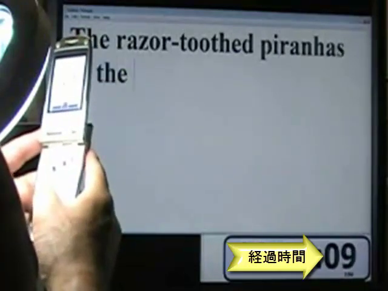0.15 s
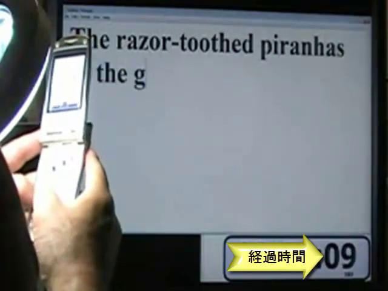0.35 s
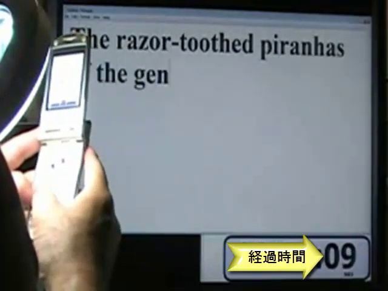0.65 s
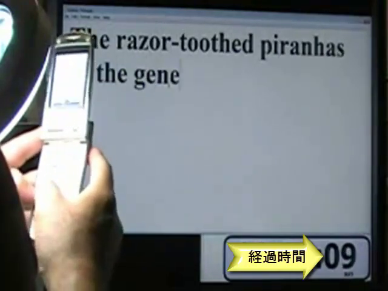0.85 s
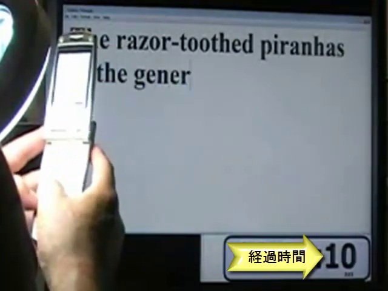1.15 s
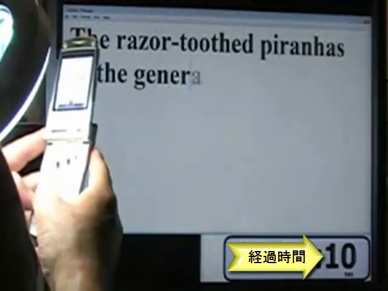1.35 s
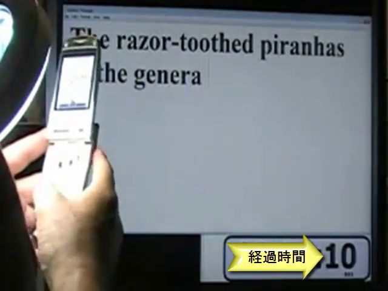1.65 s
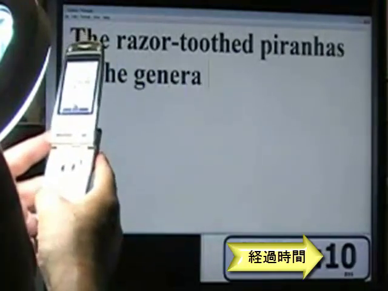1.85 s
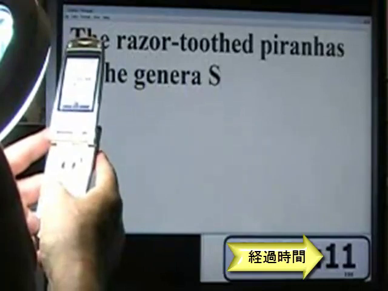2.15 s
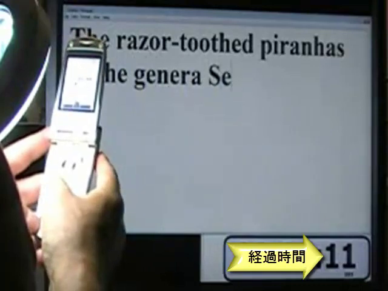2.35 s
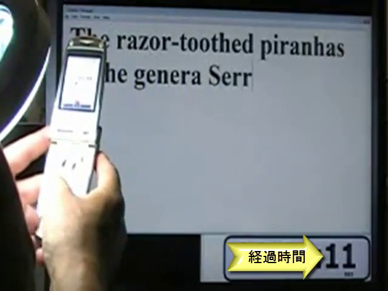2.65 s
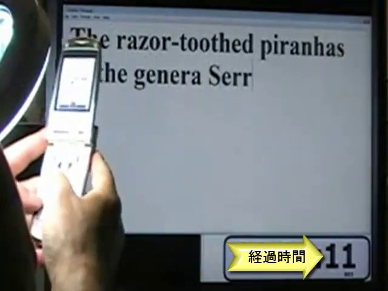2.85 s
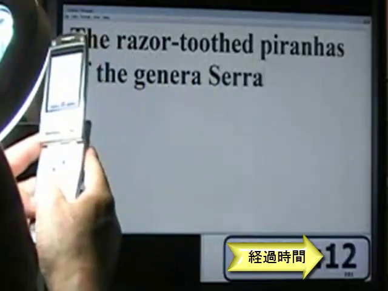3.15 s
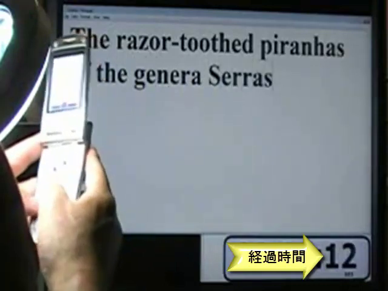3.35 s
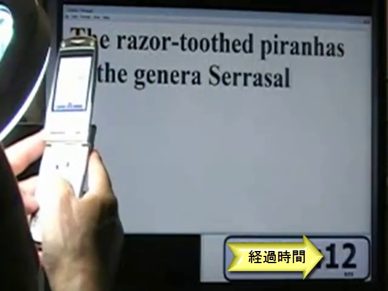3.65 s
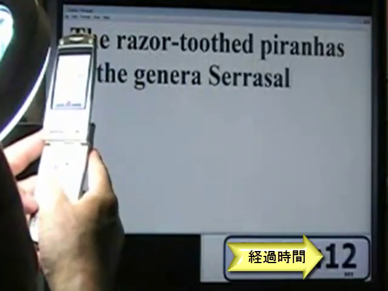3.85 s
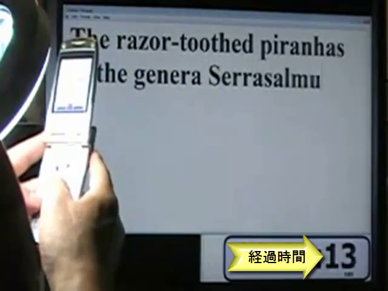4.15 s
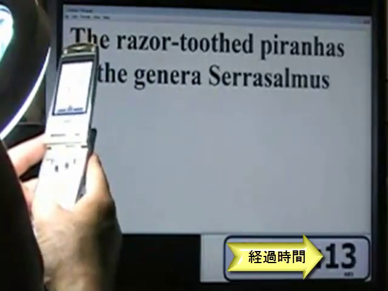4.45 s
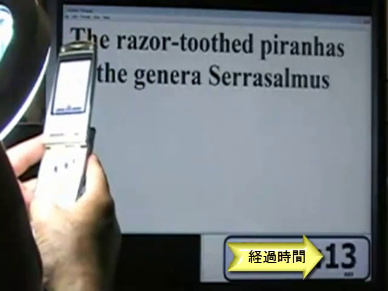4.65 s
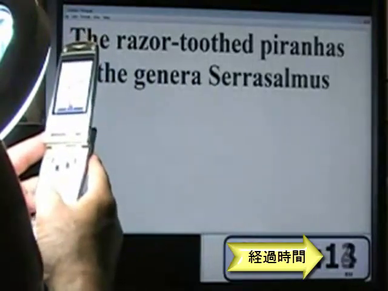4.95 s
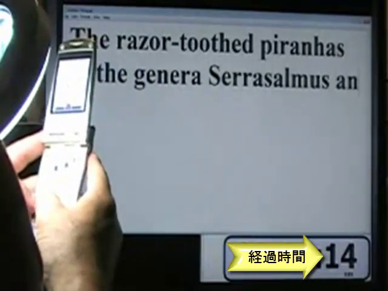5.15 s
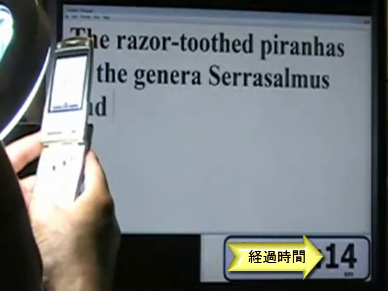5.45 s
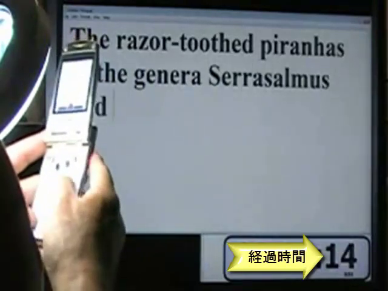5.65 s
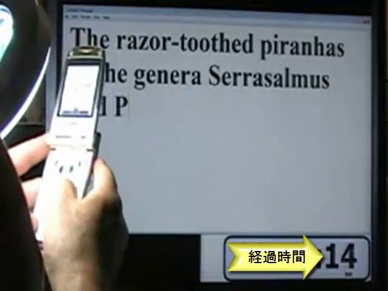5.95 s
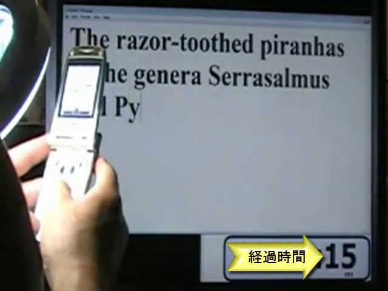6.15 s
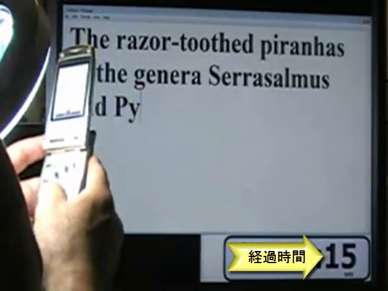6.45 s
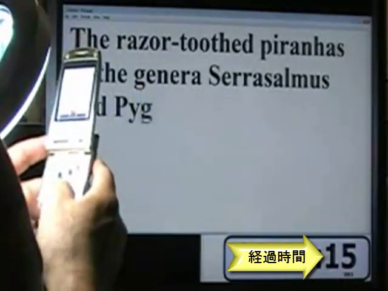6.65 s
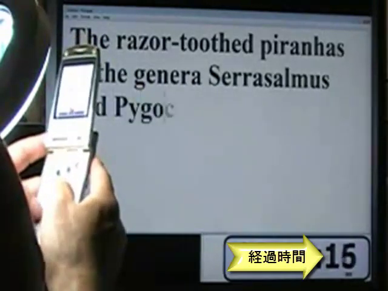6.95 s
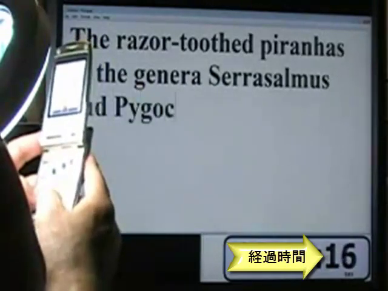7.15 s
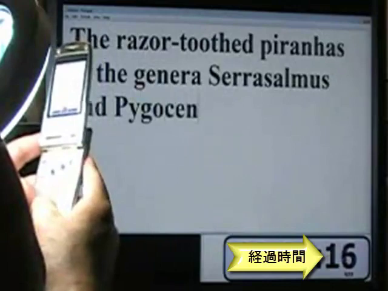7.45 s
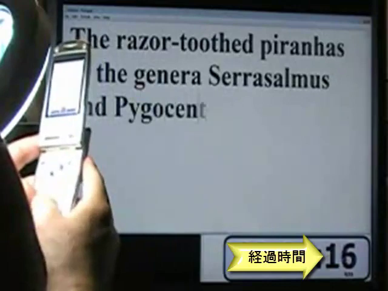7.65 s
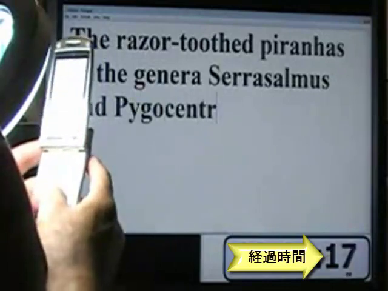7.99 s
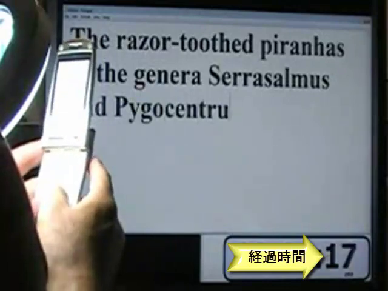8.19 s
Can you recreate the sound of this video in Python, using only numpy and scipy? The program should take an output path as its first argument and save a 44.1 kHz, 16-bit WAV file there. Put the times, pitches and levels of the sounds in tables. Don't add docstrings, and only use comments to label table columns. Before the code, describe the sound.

A thumb types quickly on a folding phone's small keypad, sharp plasticky clicks and tiny rattles over a faint steady fan hum indoors.

```python
import sys
import numpy as np
from scipy import signal
from scipy.io import wavfile
from scipy.ndimage import uniform_filter1d

SR = 44100
rng = np.random.default_rng(int(sys.argv[2]) if len(sys.argv) > 2 else 0)


def int16_out(signal):
    q = np.round(np.clip(np.atleast_2d(signal).T, -1, 1) * 32767)
    wavfile.write(sys.argv[1], SR, q.astype(np.int16))


def gain_from_db(level_db):
    decades = np.asarray(level_db, float) / 20
    return 10 ** decades


N = 366912

# pitch in Hz, level in dB per Hz.
AIR = [(30, -39), (90, -24.5), (200, -21.5), (280, -17), (420, -5.5), (650, -8.5), (1050, -9),
       (1500, -12.5), (2050, -19.5), (2800, -16.5), (3300, -29.5), (4200, -24.5), (7000, -24.5),
       (9200, -33)]
# pitch in Hz, level in dB rms, width in Hz.
TONES = [(60, -84, .24), (120, -88, 1), (300, -80, 1.5), (360, -79, 1.5), (420, -66, 1.2), (480, -69, 3),
         (540, -75, 4), (600, -75, 4), (724, -72, 5), (846, -75, 6), (960, -74, 8), (1083, -62, 4.5),
         (1446, -75, 8), (1510, -75, 20)]
# pitch in Hz, left minus right in dB.
LEAN = [(60, 3.5), (130, 1.5), (310, -1), (550, -2), (1000, -4.5), (1650, -1.5), (4000, -1)]
# pitch in Hz, likeness from -1 to 1.
SAME = [(60, 0.58), (120, 0.13), (250, -0.21), (510, -0.47), (1030, -0.23), (1500, -0.49), (2090, 0.11),
        (4260, 0.29), (8660, 0.42)]
# time in seconds, dip pitch in Hz, cover (about 0 to 1), whistle level in dB.
HAND = [(0, 2035, .2, -67), (.7, 2010, .35, -72), (1.2, 1880, .2, -80.5), (1.65, 1894, .4, -73),
        (2.25, 2040, .5, -82), (2.899, 1955, .35, -69), (3.4, 1940, .1, -65), (4.1, 1910, .2, -72.5),
        (4.78, 1986, .6, -70.5), (5.5, 2050, .1, -66), (6.3, 1790, .4, -70), (6.6, 2070, .6, -61.5),
        (6.969, 2150, .8, -72), (7.059, 2450, 1.08, -85), (7.44, 2520, 1.4, -87), (7.521, 2330, .35, -91),
        (7.94, 2280, .45, -87), (8.2, 2350, .8, -92)]
# delay in seconds, level in dB.
ECHOES = [(.0013, -8), (.0036, -16), (.0066, -16), (.0093, -17), (.0106, -19), (.0265, -17)]
# pitch in Hz, time to fall 60 dB in seconds.
ROOM = [(300, 0.31), (1000, 0.72), (2500, 0.36), (5000, 0.33), (8000, 0.24)]
# start in seconds, level in dB, pitch in Hz, 60 dB fall in seconds.
KNOCKS = [(.6765, -43.5, 595, 0.44), (0.73, -45, 1530, 0.11), (.697, -44, 630, 0.11),
          (0.697, -47.5, 1600, 0.18), (0.78, -43, 550, 0.11), (2.613, -41.5, 535, 0.1),
          (4.414, -48, 1250, 0.06), (5.08, -55, 192, 0.4), (5.3033, -35, 910, 0.27),
          (5.303, -38.5, 455, 0.33), (5.3032, -40, 655, 0.27), (5.304, -41.5, 2460, 0.29),
          (5.3032, -33, 3000, 0.23), (5.304, -39, 1920, 0.41), (5.3063, -42, 4800, 0.23),
          (5.3045, -36.5, 6850, 0.32), (5.3034, -40, 1240, 0.26), (5.368, -50.5, 198, 0.118),
          (5.53, -56.5, 201, 0.25), (6.1, -61, 177, 0.43), (6.8, -64, 190, .15), (7.42, -54.5, 250, 0.44)]
# pitch in Hz, 60 dB fall in seconds, level in dB, share of brightness (no unit).
CAP = [(4357, 0.012, -4, -0.77), (4990, 0.0034, 4.5, -0.75), (6150, 0.0068, -2, -0.05),
       (6920, 0.0059, 3.5, 0.16), (7510, 0.0058, 1.5, 0.93), (8345, 0.0036, -2.5, 1)]
# pitch in Hz, 60 dB fall in seconds, level in dB.
CASE = [(1100, 0.0024, -5.5), (1314, 0.016, 3), (1501, 0.036, -4.5), (1917, 0.022, -3.5),
        (2470, 0.0019, -14.5), (2790, 0.012, -4.5), (3380, 0.006, -1)]
# start in seconds, peak in dB, brightness in dB, case thump in dB.
PRESSES = [(.0951, -31, 2.5, -17.5), (.3061, -26.5, 19, -8), (.5417, -27.5, -5, -33), (.8591, -29, 8, -26),
           (1.3758, -27.5, 12, -28), (1.6409, -30.5, -1.5, -19.5), (1.8488, -24.5, 4, -17),
           (2.1005, -27.5, 5, -20), (2.4268, -23.5, 8.5, -14), (2.9366, -30, 7, -20),
           (3.2266, -21.5, 8.5, -18), (3.4618, -27.5, 9, -8.5), (3.6828, -26, 2.5, -26),
           (4.0104, -17.5, 9, -10.5), (4.2606, -29, 6, -10.5), (4.565, -37.5, -0.5, -16),
           (4.9052, -27.5, 7.5, -10.5), (5.0692, -28, -8, -31), (5.3031, -20.5, 9, -11.5),
           (5.739, -30, -3, -24), (6.1346, -21, 8.5, -11.5), (6.4904, -36.5, 2, -9),
           (6.8452, -30, 2, -15.5), (7.1255, -42, 7, -1.5), (7.3163, -29, 4.5, -12.5),
           (7.6809, -31, 10.5, -11), (8.0347, -36, 2.5, -9), (8.2342, -27, 6, -20)]
# start in seconds, peak in dB, brightness in dB, case thump in dB.
RELEASES = [(.227, -36, 4.5, -14), (1.0143, -27, 11, -18), (1.2024, -23.5, 8.5, -17),
            (1.4285, -32.5, 1.5, -10), (1.8159, -39, -4.5, -30), (2.1461, -30.5, 8, -18),
            (2.5573, -39.5, 1, -14), (2.7307, -35.5, 2.5, -22), (2.7951, -40, 0, -16),
            (3.5684, -32, -0.5, -23), (3.7914, -32, 2, -9.5), (3.9077, -43, -0.5, -5), (4.707, -41, 4, -24),
            (5.2534, -29, 6, -15), (5.3951, -35, 4.5, -9), (5.5322, -40, -1, -2.5),
            (5.5824, -37.5, 0.5, -21), (5.634, -33, -11, -22), (5.8015, -39, 3, -25),
            (5.8282, -30.5, 2, -12), (6.272, -33.5, 7, -9), (6.6825, -34.5, 6, -13),
            (6.995, -46.5, -3, -26), (7.4833, -38, -3.5, -4.5), (7.5617, -36, 12, -5),
            (7.7952, -31.5, -6.5, -5.5)]
# start in seconds, peak in dB, brightness in dB, case thump in dB.
ROCKS = [(.561, -30, 0, -14), (.9886, -39, 10, -30), (.9921, -38, 2.5, -16), (1.2254, -42, 14, -9),
         (1.4217, -40, -1, -12), (1.4392, -37, 9, -12), (1.8729, -32.5, -1.5, -11),
         (2.6089, -22.5, 10.5, -25.5), (2.621, -32, 2, -7), (2.7179, -47, 2, -2), (3.6911, -55, 14, -18),
         (3.8058, -33.5, -2, -12.5), (3.9158, -44.5, 0, -9), (4.274, -27, 5, -15), (5.054, -50, -10, -5),
         (5.0761, -41, 6, -9), (5.0905, -32.5, -2.5, -13.5), (6.244, -43.5, -1, -6), (6.2646, -41, 3, 2.5),
         (6.6594, -42, 3, -9.5), (6.6681, -43, 3, -22), (7.8039, -34.5, 19, -10.5),
         (8.2477, -22.5, 9, -15.5)]
# start in seconds, peak in dB, case thump in dB.
BRUSHES = [(0.031, -49, -21), (0.679, -55, -5), (0.6974, -47.5, -3), (1.052, -51, -5), (1.3464, -51.5, 4),
           (1.6054, -48.5, -10), (1.987, -54.5, -1.5), (2.3913, -49.5, -4.5), (2.905, -56, -22),
           (3.3547, -44, -16), (3.379, -47, -2), (3.43, -49, -17), (3.4398, -44, -20), (3.7276, -47, -15),
           (3.966, -43.5, -21), (4.418, -62, 12), (5.444, -56, -2), (5.5564, -40.5, -21),
           (5.6778, -50, -1.5), (5.9465, -49.5, -24), (5.9852, -47, -5.5), (6.422, -46, -14),
           (6.831, -53, -27), (7.094, -44.5, -6.5), (7.2586, -47.5, -20), (7.51, -41, -17),
           (7.734, -51, -8), (7.854, -72, -16.5), (7.985, -49, -23), (8.213, -51, -2)]
# start in seconds, peak in dB, brightness in dB, case thump in dB, length in seconds.
CRUNCHES = [
    (.292, -39, 1, -13, .0025),
    (1.1385, -41, 4, -12, .003),
    (1.1513, -30.5, 2.5, -14, 0.0028),
    (1.1655, -38, 1, -8, 0.0029),
    (1.1762, -38, 5, -23, .003),
    (1.8862, -43.5, 4, -11.5, .002),
    (2.5892, -34.5, 5.5, -29, .0022),
    (4.0077, -27, 2, -18, .0027),
    (6.2692, -40, 5, -12, 0.0033),
    (7.3126, -36.5, 2, -11.5, .003),
]
# start in seconds, peak in dB, brightness in dB.
TICKS = [(.313, -47, 8), (0.547, -42, 2), (.554, -37, 0), (0.5582, -33, 4), (0.569, -40, 4),
         (0.5738, -38, 4), (.861, -34, 4), (.8703, -41, 6), (1.0076, -49, 6), (1.0233, -43, 6),
         (1.1444, -44, 5), (1.1707, -42, 5), (1.1735, -41, 4), (1.1936, -40, 4), (1.1961, -41, 5),
         (1.2288, -41, 12), (1.374, -29, 6), (1.4508, -44, 6), (1.874, -37, 1), (2.11, -44, 4),
         (2.599, -38, 6), (2.6066, -41, 6), (2.619, -40, 6), (2.6227, -38, 4), (2.6276, -47, 4),
         (3.2302, -27.5, 6), (3.2377, -39, 4), (3.4675, -39, 1), (3.491, -42, 0), (3.7875, -40.5, 5),
         (3.7903, -36, 4), (3.7943, -41, 4), (3.8017, -43, 7), (3.823, -44, 4), (4.2678, -37, 1),
         (4.2808, -40, 4), (4.2853, -42, 3), (4.2873, -41, 4), (4.2924, -47, 4), (4.297, -41, 1),
         (4.9183, -36.5, 1), (5.0974, -42, 0), (5.2578, -36, 4), (5.3256, -34, 7), (5.4024, -43, 4),
         (5.5348, -44, 1), (5.7408, -32, -1), (5.7492, -42, 5), (5.8304, -39, 6), (6.131, -39, 7),
         (6.2771, -40, 2), (7.3188, -36, 5), (7.3275, -39, 2), (7.485, -41, 0), (7.488, -49, 4),
         (8.2442, -39, 6), (8.2593, -35, 10), (8.275, -41, 7), (8.2796, -45, 4)]
# pitch in Hz, share of moments from 0 to 1.
SIDE_KEPT = [(60, 0.68), (250, 1), (400, 1), (1400, .9), (1900, 0.94), (2600, 0.4), (3400, 0.042),
             (5000, 0.027), (9000, 0.051)]


def evened(x):
    return x / np.sqrt(np.mean(x ** 2) + 1e-20)


def read(points, hz):
    f, value = np.transpose(points)
    return np.interp(np.log(hz + 1), np.log(f + 1), value)


def add(mix, s, sound):
    part = mix[max(round(s * SR), 0):][:len(sound)]
    part += sound[:len(part)]


def wander(t, rate):
    speeds = rate * np.geomspace(.1, 1, num=20)
    return evened(sum(np.sin(2 * np.pi * (f * t + rng.random())) / np.sqrt(f) for f in speeds))


def ring(t, hz, t60, phase, rise_s):
    return gain_from_db(-60 * t / t60) * (1 - np.exp(-t / rise_s)) * np.sin(2 * np.pi * (hz * t + phase))


def narrow_noise(hz, width_hz, steady=0.):
    r = np.exp(-np.pi * width_hz / SR)
    turn = np.exp(2j * np.pi * np.cumsum(hz * np.ones(N)) / SR)
    z = rng.standard_normal((2, N + SR)) + 1j * rng.standard_normal((2, N + SR))
    for _ in range(2):
        z = signal.lfilter([1 - r], [1, -r], z)
    z = z[:, SR:]
    z = z / abs(z) ** np.clip(steady, 0, 1)
    same = np.clip(read(SAME, hz), -.9, 1)
    mid, side = z[0] * np.sqrt(1 + same), z[1] * np.sqrt(1 - same)
    return evened((turn * np.array([mid + side, mid - side])).real)


def lean(hz):
    return gain_from_db(np.multiply.outer([.5, -.5], read(LEAN, hz)))


def shadow_db(hz, at):
    s, dip_hz, cover, _ = np.transpose(HAND)
    cover = np.interp(at, s, cover)
    fingers = np.clip(.9 + .2 * wander(at, 9.), .2, 1.3)
    width_hz = 170 * (0.63 + 0.49 * abs(cover))
    distance = (hz[:, None] - np.interp(at, s, dip_hz)) / width_hz
    return -30 * cover * fingers * np.exp(-distance ** 2)


def fan_air(at):
    hz = np.fft.rfftfreq(1024, 1 / SR)
    a, b, c, d, patches = rng.standard_normal((len(at), 513, 5)).T
    patches = evened(uniform_filter1d(uniform_filter1d(patches, 8, 0), 16, 1))
    same = np.clip(read(SAME, hz), -1, 1)[:, None]
    left = a + 1j * b
    z = np.array([left, same * left + np.sqrt(1 - same ** 2) * (c + 1j * d)])
    patchy_db = 2.6
    z *= gain_from_db(read(AIR, hz)[:, None] + patchy_db * patches + shadow_db(hz, at)) * lean(hz)[:, :, None]
    return gain_from_db(-56.5) * evened(signal.istft(z, nperseg=1024, noverlap=768)[1][:, :N])


def motor_tones():
    return sum(gain_from_db(db) * lean(hz)[:, None] * narrow_noise(hz, width, steady=0.45) for hz, db, width in TONES)


def fan_whistle(at):
    base_hz, lift_hz, drift_hz, flutter_db = 2768, 447.6, 59.9, 2
    s, _, cover, whistle_db = np.transpose(HAND)
    t, flutter = np.arange(N) / SR, wander(at, 12.)
    db = np.interp(at, s, whistle_db) + flutter_db * flutter
    hz = base_hz + lift_hz * np.interp(at, s, cover) - drift_hz * flutter
    return gain_from_db(np.interp(t, at, db)) * narrow_noise(np.interp(t, at, hz), width_hz=320)


def fan():
    at = np.arange(N // 256 + 5) * 256 / SR
    return fan_air(at) + motor_tones() + fan_whistle(at)


def dipped(x):
    hz, at, z = signal.stft(x, SR, nperseg=512)
    return signal.istft(z * gain_from_db(0.54 * shadow_db(hz, at)), nperseg=512)[1][:N]


def room_tail():
    size = SR // 2
    taps, slots = np.zeros((2, size)), np.arange(100, size - 20, 12)
    at = slots + rng.integers(0, 12, (2, len(slots)))
    np.put_along_axis(taps, at, rng.standard_normal(at.shape), 1)
    hz, t, z = signal.stft(taps, SR, nperseg=128)
    same = np.clip(read(SAME, hz), -1, 1)[:, None]
    z = np.array([z[0], same * z[0] + np.sqrt(1 - same ** 2) * z[1]])
    tail = signal.istft(z * gain_from_db(-60 * t / read(ROOM, hz)[:, None]), SR, nperseg=128)[1]
    return tail / np.linalg.norm(tail[0])


def room(x):
    early = np.zeros(2048)
    for delay, db in ECHOES:
        add(early, delay, gain_from_db([db]))
    out = np.zeros((2, N))
    for k in range(3):
        turn = np.sqrt(2 / 3) * np.cos(np.pi * (np.arange(N) / SR * 3.1 + k / 3))
        out += signal.fftconvolve((x * turn)[None], room_tail(), axes=1)[:, :N]
    return gain_from_db(-1) * out + signal.oaconvolve(x, early)[:N]


def knocks():
    out, t = np.zeros((2, N)), np.arange(SR // 3) / SR
    blow_db, blow_t60_s = 2.5, 0.047
    for s, db, hz, t60 in KNOCKS:
        b, a = signal.iirpeak(hz, 2.7, SR)
        noise = rng.standard_normal((2, len(t)))
        mid, side = signal.lfilter(b, a, signal.lfilter(b, a, noise))
        side = side * np.clip(1.1 - read(SAME, hz) - hz / 3000, .05, 1.5)
        wake = evened(np.array([mid + side, mid - side])) * gain_from_db(-60 * t / min(t60, .4))
        wake *= 0.67 + gain_from_db(blow_db - 60 * t / blow_t60_s)
        wake *= 1 - np.exp(-t * hz / 2.0)
        knock = 1.2 * ring(t, hz, 0.14 * min(t60, .3), 0, .5 / hz)
        burst = gain_from_db(db) * (0.88 * wake + knock)
        add(out[0], s, burst[0])
        add(out[1], s, burst[1])
    return out


def snaps():
    brushes = [(s, db, 2, case_db) for s, db, case_db in BRUSHES]
    ticks = [(*row, -20.5) for row in TICKS]
    kinds = ((PRESSES, -1), (RELEASES, -2), (ROCKS, -2.5), (brushes, -0.5), (CRUNCHES, -5), (ticks, -9))
    rattle_per_db = -0.21
    return [(*row[:4], rattle_db + rattle_per_db * (row[1] + 30), sum(row[4:]))
            for rows, rattle_db in kinds for row in rows]


def struck(modes, luck, t, spread, uneven_db, damping, rise_s):
    out = np.zeros(len(t))
    for (hz, t60, db), tune, phase, size in zip(modes, *luck):
        tone = ring(t, hz * (1 + spread * (tune - .5)), t60 * damping, 0.53 * phase, rise_s)
        out += tone * gain_from_db(db + uneven_db * (size - .5))
    return out / abs(out).max()


def chatter(wet_db, grind_s, when, size):
    hits = np.zeros(512)
    hits[(511 * when ** 1.6).astype(int)] = gain_from_db(wet_db - 12.5 - 5.2 * when ** 2.7) * (2 * size - 1)
    hits[0] = 1
    if grind_s:
        slips = (np.clip(grind_s, 0, .01) * SR * (np.arange(7) + when) / 7).astype(int)
        hits[0] = .5
        hits[slips] = np.sign(size - .5) * (.5 + .5 * when)
    return hits


def keys():
    near, far, t = np.zeros(N), np.zeros(N), np.arange(1024) / SR
    spike = gain_from_db(-1.5) * ring(t, 6660, 0.0013, 0, .00003)
    crack = ring(t, 2850, 0.0033, 0, .0001)
    for s, db, bright_db, case_db, wet_db, grind_s in snaps():
        cap_luck, case_luck = rng.random((2, 3, len(CASE)))
        hits = chatter(wet_db, grind_s, *rng.random((2, 7)))
        cap = [(hz, t60, mode_db + share * (bright_db - 3.5)) for hz, t60, mode_db, share in CAP]
        for mix, damping, level_db in ((near, .7, db + 3.0), (far, .22, db + 5.5 + wet_db)):
            cap_ring = struck(cap, cap_luck, t, .07, 5, damping, .00007) + spike
            case_ring = struck(CASE, case_luck, t, 0.19, 6.2, damping, 0.00079)
            snap = 1.383 * cap_ring / abs(cap_ring).max()
            snap += gain_from_db(case_db - 1.5) * case_ring + gain_from_db(case_db) * crack
            add(mix, s, gain_from_db(level_db) * np.convolve(snap, hits))
    return near, far


def scene():
    no_bass = signal.butter(3, 750, "high", fs=SR, output="sos")
    near, far = signal.sosfilt(no_bass, keys())
    return fan() + knocks() + room(dipped(far)) + near


def dropped(excess):
    return 1 / (1 + np.exp(np.clip(excess, -30, 30)))


def smeared(mid):
    z = signal.stft(mid, nperseg=896)[2]
    level = np.sqrt(uniform_filter1d(abs(z) ** 2, 9, 0)) * (np.arange(len(z)) > 4)[:, None]
    grain = level * (rng.standard_normal(z.shape) + 1j * rng.standard_normal(z.shape))
    return mid + gain_from_db(-12) * signal.istft(grain, nperseg=896)[1][:N]


def thinned(x):
    mid, side = smeared((x[0] + x[1]) / 2), (x[0] - x[1]) / 2
    hz, _, z = signal.stft(np.array([mid, side]), SR, nperseg=2048)
    frames, pitch = z.shape[2], hz[:, None]
    band = np.round(8.3 * np.log2(1 + hz / 500)).astype(int)
    dice = np.repeat(rng.random((3, 80, frames)), 2, axis=2)[:, band, :frames]
    budget = np.repeat(rng.random(frames), 2)[:frames]
    kept = read(SIDE_KEPT, hz)[:, None] + 0.29 * (budget < .12) - .5 * (budget > .82)
    kept = np.clip(kept, .01, 1)
    power = uniform_filter1d(abs(z) ** 2, 3, 2)
    mask_db = 10 * np.log10(uniform_filter1d(power.mean(0), 61, 0) + 1e-20)
    mid_db, side_db = 10 * np.log10(uniform_filter1d(power, 4, 1) + 1e-20) - mask_db
    low = pitch < 300
    hole_db, side_hole_db, speckle_db = -8, -6, -11
    holes = dropped(mid_db - hole_db + 7 * (dice[0] - .5) + 3 * low)
    z[0] *= 1 - .93 * holes * (pitch > 135) * (pitch < 8500)
    line_db = 10 * np.log10(power[0] + 1e-20) - mask_db
    z[0] *= 1 - dropped(line_db - speckle_db) * (pitch > 1400)
    kept[hz > 3900] = budget < .07
    kept[hz < 290] = dice[1, 0] < .55
    z[1] *= dropped((dice[1] - kept) * 60)
    z[1] *= 1 - dropped(side_db - side_hole_db + 12 * (dice[2] - .5) + 12 * low)
    mid, side = signal.istft(z, nperseg=2048)[1][:, :N]
    return np.array([mid + side, mid - side])


def roll_off(x):
    return signal.sosfilt(signal.butter(12, 9260, fs=SR, output="sos"), x)


def record(dry):
    edge = signal.firwin(255, 8850, window=("kaiser", 8), fs=SR)
    mix = signal.oaconvolve(thinned(dry), edge[None], "same")
    return roll_off(mix)


dry = scene()
out = record(dry)
int16_out(out)
```